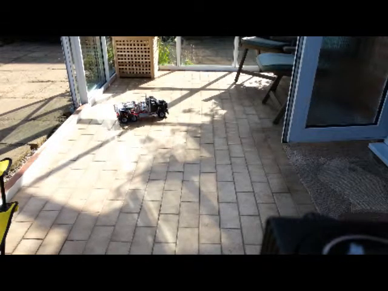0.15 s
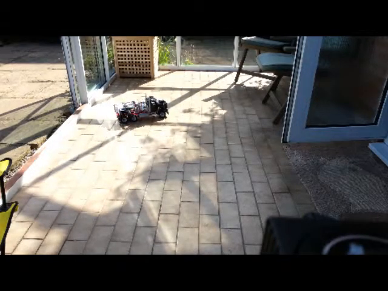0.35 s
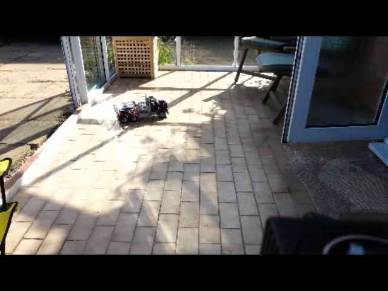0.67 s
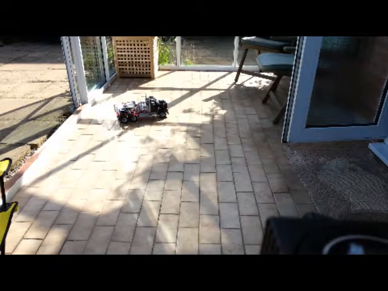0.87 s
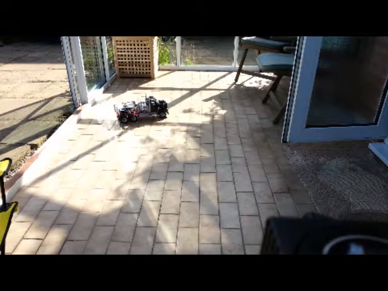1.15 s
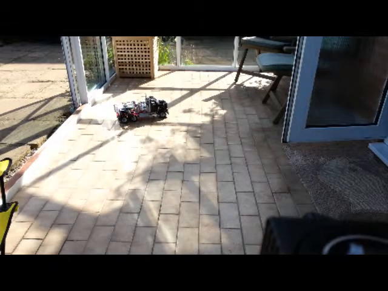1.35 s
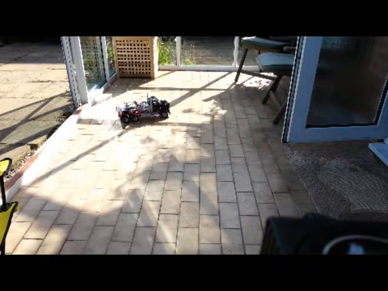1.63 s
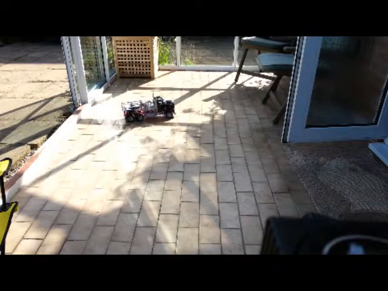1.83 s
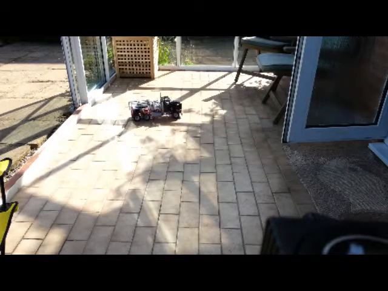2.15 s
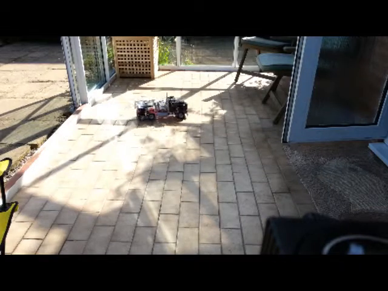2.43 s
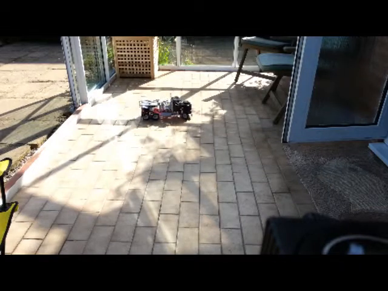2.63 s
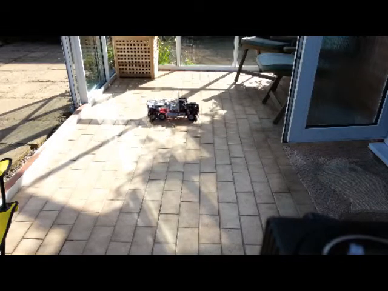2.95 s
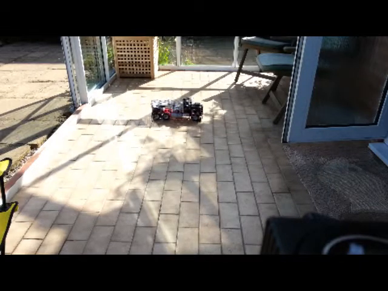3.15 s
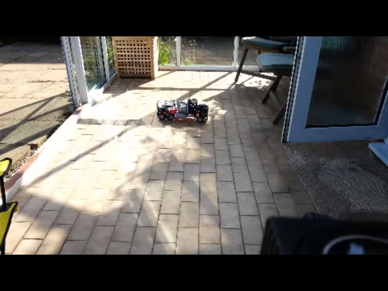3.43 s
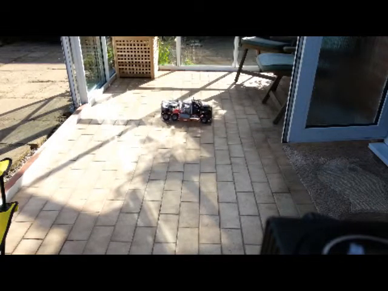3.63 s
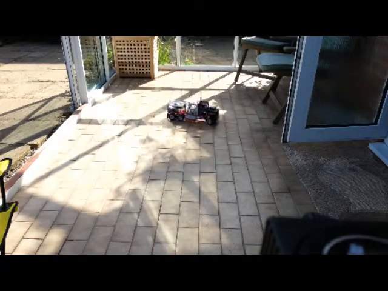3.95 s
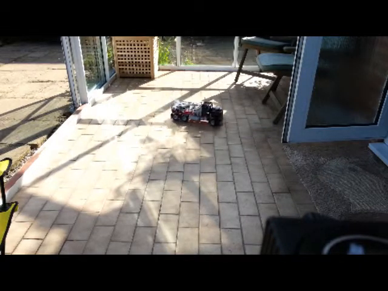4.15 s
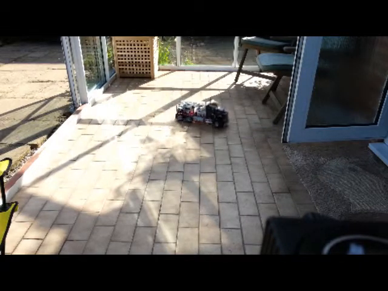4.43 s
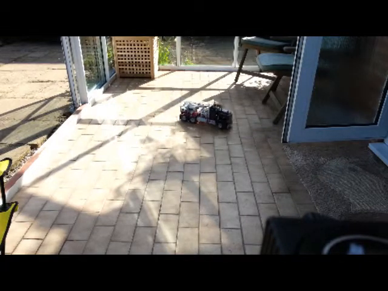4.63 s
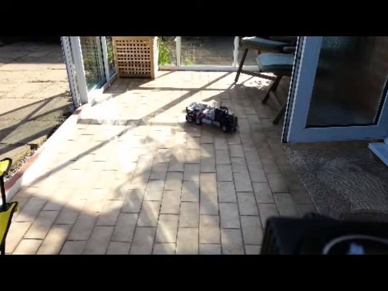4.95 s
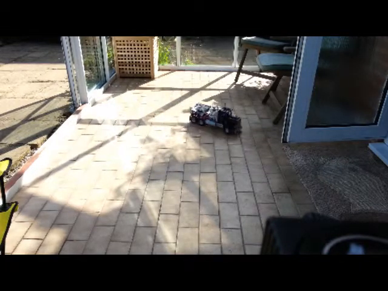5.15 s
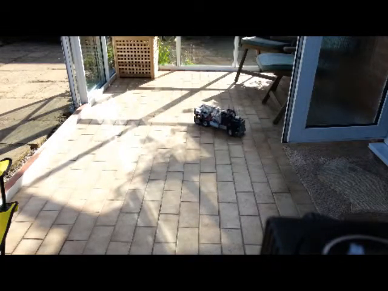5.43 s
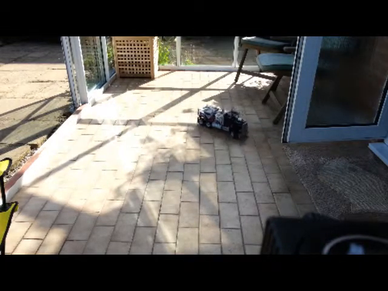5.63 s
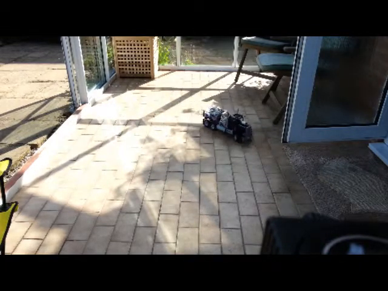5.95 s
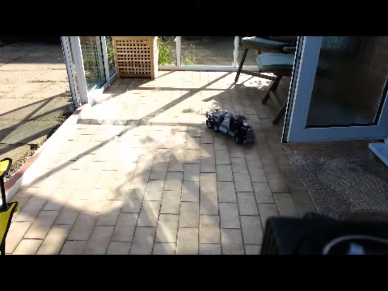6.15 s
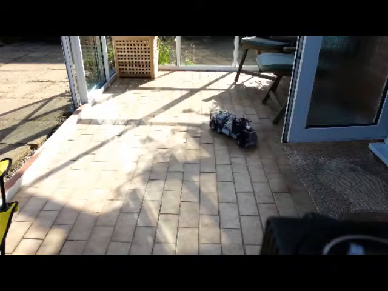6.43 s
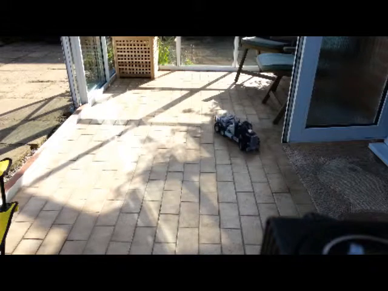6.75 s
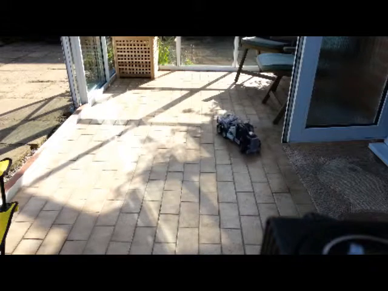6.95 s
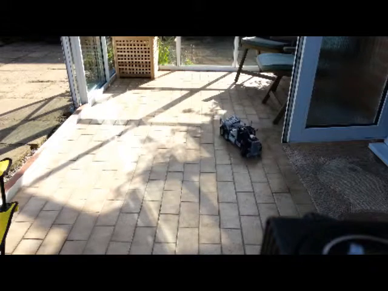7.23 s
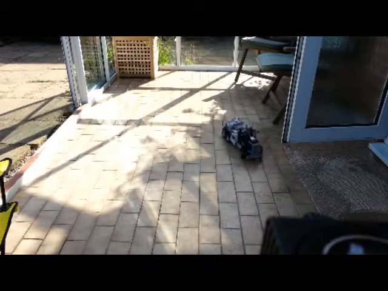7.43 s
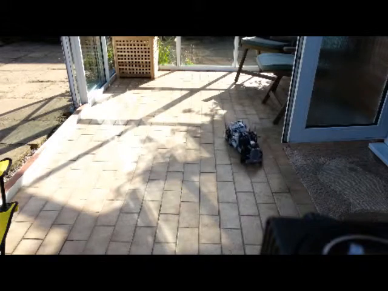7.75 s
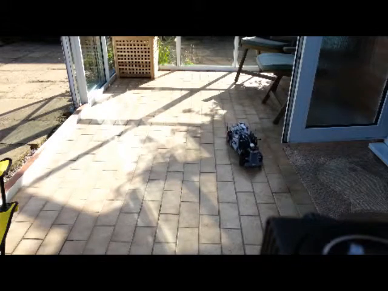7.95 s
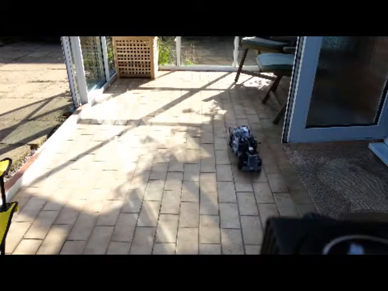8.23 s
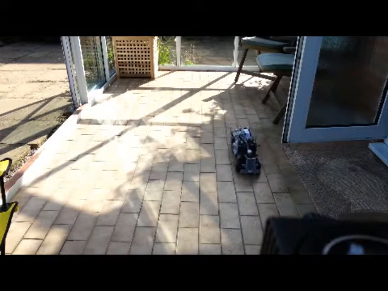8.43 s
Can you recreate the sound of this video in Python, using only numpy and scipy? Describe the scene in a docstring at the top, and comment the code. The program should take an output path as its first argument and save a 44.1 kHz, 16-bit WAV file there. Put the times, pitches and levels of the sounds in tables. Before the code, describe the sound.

The tail of a small electric motor fades, followed by a gap of soft air, low wind buffets, a tiny plastic tick and quick sparrow whistles. The motor restarts with a laboured growl and jumps in pitch, settling into a slightly wavering, buzzy plastic-gear whine that runs to the end. Wheels rumble lightly over paving, sparse chirps and barely audible distant hoots show through, and late wind thumps hit the microphone.

```python
"""A small model truck crawls over paving between glass walls and passes in front of two microphones.
Its motor coasts out, restarts and whines: a ten-tooth pinion sings at multiples of the tooth rate, over
shaft-locked gear rattle, brush hiss and wheel rumble, all with yard echoes except the rumble.
Wind noise buffets the microphone ports, sparrows chirp nearby as gliding, warbling whistles,
a plastic part ticks once, faint low hoots come from afar, and quiet outdoor air lies underneath."""
import sys
import numpy as np
from scipy import signal
from scipy.fft import rfft, irfft, next_fast_len
from scipy.io import wavfile

SR = 44100
rng = np.random.default_rng(int(sys.argv[2]) if len(sys.argv) > 2 else 0)


def to_wav(s):
    """Save 16-bit WAV."""
    ch = np.atleast_2d(s).T  # columns
    pcm = np.round(np.clip(ch, -1, 1) * 32767)  # PCM
    wavfile.write(sys.argv[1], SR, pcm.astype(np.int16))


N = 378378

# In every table a positive left-right level means louder on the left; spectra are relative shapes.
# Motor speed at its turning points: it spins up in two pulls, then sags about once a wheel turn.
# Each row: time in seconds, tooth rate in Hz.
TOOTH_RATE = [(1.24, 304.2), (1.32, 495), (1.39, 536.5), (1.45, 504.5), (1.52, 465), (1.58, 548),
              (1.64, 600.4), (1.74, 673), (1.81, 633.4), (1.92, 596.6), (2.12, 643.4), (2.27, 612.6),
              (2.4, 642.8), (2.56, 639), (2.74, 624), (2.97, 645), (3.28, 615.2), (3.51, 645.4),
              (3.79, 599), (3.88, 616.2), (4.02, 634.6), (4.15, 629.8), (4.31, 607.7), (4.64, 648.6),
              (4.83, 619.8), (5.03, 656.5), (5.32, 587.7), (5.54, 632.5), (5.75, 624.3), (6.03, 633.4),
              (6.36, 595.2), (6.63, 634.8), (6.82, 607.6), (6.99, 616), (7.18, 590.3), (7.35, 603),
              (7.48, 618), (7.59, 618.7), (7.75, 603.3), (8.06, 626), (8.39, 611.4), (8.58, 622)]
# Motor noise through coasting, rest, start and drive, before the mix gains.
# Each row: time in seconds, rattle level in dB, brush hiss level in dB.
MOTOR_LEVELS = [(0, -43.5, -43.5), (.12, -54.5, -49.5), (.25, -69, -81), (1.2, -63.5, -67),
                (1.235, -58, -58), (1.265, -53, -43), (1.28, -48, -46), (1.32, -38.5, -43), (1.4, -39, -51),
                (1.48, -40, -49.5), (1.61, -37, -40.5), (1.9, -34.5, -40.5), (2.2, -33.5, -40.5),
                (5.8, -34.5, -40.5), (7.2, -36, -40.5), (8.58, -35.5, -40.5)]
# The truck crosses in front of the microphones.
# Each row: time in seconds, delay of the left microphone in ms, left-right level in dB.
POSITION = [(0, 0.32, -1.5), (5.2, 0.42, -1.5), (6.2, -0.0635, -1), (8.58, -0.044, -1)]
# Gear tones beside the whine. Each row: cycles per shaft turn, level in dB re the rattle before extra gain.
GEAR_TONES = [(10, -36), (12, -35.5), (17, -35.5), (24, -32), (27, -23), (33, -33), (37, -24.5), (38, -36),
              (42, -22), (43, -24), (44, -29.5), (47, -22.5), (52, -22.5), (53, -35.5), (57, -23.5),
              (62, -17), (64, -21), (66, -21), (73, -19), (76, -38), (86, -29), (90, -21), (92, -29),
              (100, -27), (110, -28), (139, -27), (159, -26), (166, -30), (169, -28), (179, -28)]
# Extra gain of these gear tones. In order: before and after the truck is under way, in dB.
GEAR_TONES_GAIN = (6, 3)
# Uneven shaft turning. In order: spread before and after the truck is under way, in radians.
SHAFT_SHUDDER = (.042, .004)
# Colour of the gear rattle. Each row: frequency in Hz, density in dB per Hz.
RATTLE_SPECTRUM = [(470, -107), (800, -20.5), (879, -19), (1230, -13), (1350, -14), (1570, -19),
                   (1840, -5.5), (2200, -15), (2650, -8.5), (2860, -9), (3100, -2), (3450, -8), (3900, -1),
                   (4150, -4), (4460, 3), (4740, -6), (4970, -3.5), (5300, -6.5), (7500, -21.5),
                   (9750, -17), (16500, -120)]
# Colour of the brush hiss. Each row: frequency in Hz, density in dB per Hz.
BRUSH_SPECTRUM = [(3820, -38), (6500, -4), (8800, -9), (10100, -1), (10700, 0.5), (11300, -3.5),
                  (14400, -30)]
# Wheel rumble on the paving. Each row: time in seconds, level in dB.
ROLLING_LEVEL = [(0, -75), (.12, -59.5), (1.2, -61.5), (1.32, -53), (1.42, -58.5), (1.61, -52),
                 (2.1, -55.5), (4.0, -58), (4.7, -59), (6.0, -57), (6.5, -55), (8.3, -56), (8.58, -56)]
# Balance of the wheel rumble before flicker. Each row: band centre in Hz, level in dB.
RUMBLE_BANDS = [(200, -7.5), (270, -1.5), (370, 2), (500, 2), (680, 2), (900, 3), (1200, -38)]
# Background air sinks once the motor runs, then creeps back. Each row: time in seconds, level in dB.
AIR_LEVEL = [(0, -53), (1.2, -54.5), (1.7, -68), (7.3, -56.5), (8.58, -58)]
# Colour of the outdoor air. Each row: frequency in Hz, density in dB per Hz.
AIR_SPECTRUM = [(110, -85), (170, -30), (250, -12), (600, -14.5), (1200, -20), (3000, -23), (6500, -26),
                (12000, -25), (14500, -32.5)]
# Wind at the ports before flutter. Each row: time in seconds, rumble level in dB, left-right level in dB.
GUSTS = [(0, -73, 7), (.2, -43, 13), (.4, -55.5, -18), (.72, -66, 22), (.82, -45.5, 10), (1.0, -59, 11),
         (1.3, -71, -7), (1.53, -68, 2), (1.59, -95, 0), (1.66, -62.5, 20), (1.96, -68, 11),
         (2.25, -58, 13.5), (2.42, -73, 26), (2.63, -66, 10), (2.69, -97, 0), (2.74, -57, 1),
         (3.06, -70, 11), (3.11, -100, 0), (3.82, -105, 0), (3.89, -57, 18), (3.97, -93, 2), (4.03, -63, 3),
         (4.17, -105, 0), (4.26, -60, 7), (4.33, -114, 0), (7.4, -105, -17), (7.46, -60, -8),
         (7.53, -90, 3), (7.66, -55.5, -4), (7.78, -59, -44), (7.88, -59.5, 2), (8.08, -48.5, -27),
         (8.26, -63, 0), (8.32, -80, 3), (8.4, -68, 13), (8.58, -88, 11)]
# Colour of the wind rumble. Each row: frequency in Hz, density in dB per Hz.
WIND_SPECTRUM = [(25, -50), (60, -7), (120, -6.5), (180, -8), (300, -17.5), (500, -37), (1000, -100)]
# The hardest buffets on the ports.
# Each row: start in seconds, envelope peak in dB, pitch in Hz, left-right level in dB.
BUFFETS = [(0.123, -44.5, 158, 34), (0.169, -48, 151, 7), (0.204, -31, 197.7, -11), (0.299, -39, 153, 8),
           (0.367, -35.5, 82, -10), (0.766, -36, 104, 0), (0.827, -38, 133, 19), (0.854, -41, 155, 18),
           (0.955, -41, 114, 10), (2.03, -43, 102, 5), (7.721, -37.5, 193.3, -31),
           (7.801, -38.5, 193, -36.5), (7.873, -33, 97.1, 2), (7.945, -48, 117.8, -19),
           (8.073, -42, 136.9, -33), (8.103, -39, 111.7, -18), (8.149, -33, 179.3, -7),
           (8.2, -42, 156.9, 5)]
# Sparrows nearby, levels before the echo mix. Each row: start in seconds, length in seconds, start, middle
# and end pitch in Hz, warble depth in Hz, level in dB, left-right level in dB.
CHIRPS = [(0.068, 0.06, 4000, 4150, 3850, 140, -34, -2), (0.085, 0.04, 3700, 3480, 3300, 80, -41, -2),
          (0.118, 0.06, 3050, 3000, 2850, 200, -38, -3), (0.625, 0.05, 5000, 5250, 4900, 250, -51, -5),
          (0.645, 0.095, 3300, 4500, 2956, 380, -34, -2), (0.741, 0.094, 3800, 3300, 2960, 260, -42.5, 1),
          (0.825, 0.09, 5300, 5100, 4300, 400, -54, -4), (0.838, 0.055, 2830, 2520, 2400, 150, -45.5, -1),
          (0.88, 0.08, 2700, 3700, 2700, 300, -40, -0.5), (1.172, 0.13, 5050, 4300, 3500, 400, -42, -2),
          (1.2, 0.14, 3500, 3150, 2750, 260, -41, -2), (1.219, 0.045, 6580, 6560, 6520, 20, -46, -11),
          (1.232, 0.03, 6050, 6000, 5950, 60, -49, -5), (1.39, 0.044, 3700, 4210, 3700, 220, -35.5, -4),
          (4.01, 0.098, 4305, 3744, 2970, 450, -37.5, -2), (5.399, 0.11, 4485, 3795, 3180, 450, -37, -5),
          (5.8, 0.05, 6080, 6000, 5820, 60, -42, -3), (6.978, 0.11, 4710, 3998, 3030, 450, -34.5, -1),
          (7.74, 0.04, 5850, 5830, 5740, 50, -42, -7), (7.802, 0.079, 4150, 3780, 2915, 380, -35.5, -1),
          (8.215, 0.055, 6050, 5980, 5880, 50, -41, -4)]
# A plastic part settles. Each row: start in seconds, starting noise level in dB before the band filter.
TICK = [(0.169, -32)]
# The tooth tones set in. In order: start and end of the fade-in, in seconds.
SPIN_UP = (1.26, 1.31)
# Three times the tooth rate, swelling and fading as the truck turns, before random fades and case ring.
# Each row: time in seconds, peak level in dB.
THIRD_TONE = [(1.3, -56), (1.38, -39), (1.4, -35), (1.46, -54), (1.57, -44), (1.74, -53), (1.81, -34),
              (1.89, -33.5), (2.08, -42), (2.23, -36), (2.62, -41), (2.72, -36.5), (2.91, -48), (3.12, -39),
              (3.15, -43), (3.22, -34.5), (3.56, -45.5), (3.73, -30.5), (3.79, -39.5), (3.87, -35),
              (4.14, -42), (4.32, -39), (4.45, -44), (4.5, -37.5), (4.57, -44), (4.76, -35), (4.8, -37),
              (4.89, -40), (4.95, -42.5), (5.17, -34), (5.21, -35), (5.37, -34), (5.51, -44), (5.59, -36),
              (5.63, -53), (5.71, -38), (5.91, -44), (6.11, -38.5), (6.2, -38), (6.28, -26.5),
              (6.41, -34.5), (6.47, -33), (6.55, -37), (6.83, -34), (7.04, -41.5), (7.08, -35.5),
              (7.2, -33), (7.26, -35.5), (7.56, -33.5), (7.61, -33.5), (7.71, -39), (7.76, -32),
              (7.88, -38.5), (7.94, -28), (8.03, -29.5), (8.1, -24.5), (8.171, -37), (8.27, -30.5),
              (8.35, -36), (8.4, -31), (8.45, -37), (8.54, -35)]
# Higher tooth tones, before random fades and case ring.
# Each row: time in seconds, fifth, seventh and eighth tone peak level in dB.
UPPER_TONES = [(1.3, -62, -59, -43), (1.53, -56, -54, -39), (1.65, -59, -51, -46), (1.75, -60, -51, -46),
               (1.8, -44, -38, -39), (1.86, -48, -40, -53), (1.92, -52, -45, -54), (2.01, -51, -44, -43),
               (2.1, -54, -43, -36), (2.26, -42, -37, -55), (2.36, -57, -50, -48), (2.45, -50, -41, -44),
               (2.74, -44, -40, -46), (3.0, -50, -43, -57), (3.29, -40, -42, -51), (3.54, -63, -42, -46),
               (3.67, -42, -40, -44), (3.78, -43, -37, -47), (4.12, -43, -40.5, -48),
               (4.28, -37.5, -40, -45), (4.63, -47, -42, -52), (4.82, -42, -35.5, -40),
               (4.96, -46, -42, -52), (5.29, -41.5, -38.5, -42), (5.5, -42, -41.5, -41.5),
               (6.23, -44, -39.5, -46), (6.36, -43, -34, -46), (6.62, -45, -45, -46),
               (6.77, -37.5, -37.5, -42), (7.24, -43, -45.5, -48), (7.54, -40, -40.5, -55),
               (7.96, -47, -45, -43), (8.35, -35.5, -38, -50), (8.54, -39, -44, -57)]
# How strongly the gear case radiates the second, fourth and sixth tooth tone, before random fades.
# Each row: frequency in Hz, peak level in dB re the rattle setting.
CASE_RESPONSE = [(900, -19), (1180, -21), (1250, -19), (1310, -12.5), (1350, -3), (2000, -39), (2450, -11),
                 (2600, -13.5), (3200, -29), (3650, -9.5), (3850, -11.5)]
# A sharp ring of the case lifts a tone passing through. In order: centre in Hz, width in Hz, lift in dB.
CASE_RING = (4125, 45, 7)
# The gears labour at the start. Each row: time in seconds, level in dB.
GROWL_LEVEL = [(1.27, -90), (1.32, -53), (1.39, -51), (1.42, -44), (1.55, -45), (1.62, -52), (1.68, -88)]
# Colour of that growl. Each row: frequency in Hz, density in dB per Hz.
GROWL_SPECTRUM = [(1250, -44), (1420, 1), (1490, -8), (1570, 0), (1680, -16), (1790, 0), (1840, -16),
                  (1895, 6), (1960, -13), (2150, -35)]
# Faint low hoots from afar. Each row: start and length in seconds, start and end pitch in Hz, peak in dB.
HOOTS = [(3.93, 0.21, 824, 830, -55), (5.6, 0.31, 552, 467.3, -55.5), (6.25, 0.18, 458, 369, -59),
         (6.37, 0.229, 853, 782, -56.5), (7.2, 0.26, 473.5, 385.8, -60.5)]

TEETH = 10
UNDER_WAY_S, SETTLE_S = 1.66, 0.41   # the shaft turns unevenly under load, then settles over this time
YARD_T60_S, GARDEN_T60_S = 0.75, 0.36   # the birds sit outside, with shorter echoes
TREBLE_T60_S = 1   # extra damping above the middle range
ECHO_CHANGE_S = 0.45   # the moving truck meets a new set of echoes this often
RASP, RASP_HZ = 0.33, 614   # greatest breathy roughness of the chirps, and its bandwidth
CUTOFF_HZ = 14500


def amp(db):
    """Decibels to gain."""
    return 10 ** (np.asarray(db) / 20)


def rms_one(x):
    """Scale to unit rms."""
    return x / np.sqrt(np.mean(x ** 2) + 1e-20)


def noise():
    """White noise, unrelated at the two microphones."""
    return rng.standard_normal((2, N))


def in_time(rows):
    """Columns of a curve table at every sample."""
    s, *columns = np.transpose(rows)
    return [np.interp(np.arange(N) / SR, s, c) for c in columns]


def eased(rows):
    """A curve that swings smoothly from one turning point to the next."""
    s, value = np.transpose(rows)
    place = np.interp(np.arange(N) / SR, s, np.arange(len(s)))
    smooth_place = place - np.sin(2 * np.pi * place) / (2 * np.pi) * 0.572
    return np.interp(smooth_place, np.arange(len(s)), value)


def panned(pan_db):
    """Left and right gains for a level difference."""
    return amp(np.array([pan_db / 2, -pan_db / 2]))


def colour(x, spectrum):
    """Shape by a (Hz, dB) spectrum, read on a log frequency axis; rms 1."""
    size = next_fast_len(N)
    hz, db = np.transpose(spectrum)
    bin_hz = np.arange(size // 2 + 1) * SR / size
    gain = amp(np.interp(np.log(bin_hz + 1), np.log(hz), db))
    return rms_one(irfft(rfft(x, size) * gain, size)[..., :N])


def drift(rate_hz):
    """Slow chance of spread 1, own in each channel: noise every 64 samples through a two-pole lowpass."""
    r = np.exp(-2 * np.pi * rate_hz * 64 / SR)
    steps = rng.standard_normal((2, N // 64 + 1002))
    slow = signal.lfilter([1], [1, -2 * r, r * r], steps)[:, 1000:]   # skip the filter's start
    return np.array([np.interp(np.arange(N) / 64, np.arange(len(s)), rms_one(s)) for s in slow])


def yard(x, t60_s):
    """Dense reflections from glass and paving, unrelated at the two microphones; the treble dies sooner."""
    t = np.arange(SR // 2) / SR
    white = rng.standard_normal((2, len(t)))
    dull = signal.sosfilt(signal.butter(2, 3600, fs=SR, output="sos"), white)
    echo = dull + (white - dull) * amp(-60 * t / TREBLE_T60_S)
    echo = echo * amp(-60 * t / t60_s) * np.minimum(t / 0.018, 1)   # builds up over 18 ms
    return signal.fftconvolve(x, echo / np.sqrt(np.sum(echo ** 2) / 2), axes=1)


def yard_on_the_move(x):
    """Overlapping stretches of the drive, each with echoes of its own."""
    hop = int(ECHO_CHANGE_S * SR)
    padded = np.pad(x, ((0, 0), (hop, 2 * hop)))
    out = np.zeros((2, N + 3 * hop + SR))
    fade = np.sin(np.pi * np.arange(2 * hop) / (2 * hop))
    for i in range(0, N + hop, hop):
        wet = yard(padded[:, i:i + 2 * hop] * fade, YARD_T60_S)
        out[:, i:i + wet.shape[1]] += wet
    return out[:, hop:hop + N]


def truck():
    """Gear and brush noise locked to the motor shaft, plus wheels, placed before the microphones."""
    tooth_hz = eased(TOOTH_RATE)
    rattle_db, hiss_db = in_time(MOTOR_LEVELS)
    lag_ms, pan_db = in_time(POSITION)
    change_s = (UNDER_WAY_S, UNDER_WAY_S + SETTLE_S)
    shudder, tones_db = in_time(np.transpose([change_s, SHAFT_SHUDDER, GEAR_TONES_GAIN]))
    turn = 2 * np.pi * np.cumsum(tooth_hz / TEETH) / SR + shudder * drift(76.6)[0]   # shaft angle, radians
    wobble = np.cos(turn)    # an off-centre pinion puts side lines one shaft order apart
    beat = 1 + 0.5 * wobble + 0.024 * np.cos(3 * turn) + 0.28 * np.cos(TEETH * turn)
    play = noise() * beat * amp(2.0 * drift(44.0))   # loose play, beaten by the turn
    flaws = tooth_flaws(turn)
    gears = amp(-3.3) * rattle(play, flaws) + amp(tones_db) * gear_tones(turn, wobble)
    noisy = amp(rattle_db) * gears + growl(play) + amp(hiss_db) * brush_hiss(beat, flaws)
    tooth_tones = whine(tooth_hz, turn, wobble, rattle_db)
    # both microphones share part of the direct sound, the left with its own delay
    first, second = noisy
    late = np.interp(np.arange(N) - lag_ms * SR / 1000, np.arange(N), first)
    alike = 0.55
    direct = np.array([late, alike * first + np.sqrt(1 - alike ** 2) * second])
    echoes = yard_on_the_move(amp(-2) * direct + amp(-12) * tooth_tones)
    rumble = amp(in_time(ROLLING_LEVEL)[0]) * wheels()
    return panned(pan_db) * (direct + tooth_tones + rumble + echoes)


def gear_tones(turn, wobble):
    """Sines at shaft orders; moving echoes swell, cancel and shift each one differently at each microphone."""
    out = 0
    for order, db in GEAR_TONES:
        phase = order * turn + 0.4 * wobble + 1.95 * drift(4.8)
        out = out + amp(db) * np.sqrt(2) * amp(4.0 * drift(17.0)) * np.sin(phase)
    return out


def tooth_flaws(turn):
    """The same tooth flaws return on every turn: a random wave of 200 shaft orders read by angle; rms 1."""
    waves = irfft(np.exp(2j * np.pi * rng.random((2, 200))), 2048)
    where = turn / (2 * np.pi) % 1 * 2048
    return rms_one(np.array([np.interp(where, np.arange(2048), w, period=2048) for w in waves]))


def rattle(play, flaws):
    """Loose play and repeating tooth flaws, coloured as gear rattle; rms 1."""
    return colour(play + 0.8 * flaws, RATTLE_SPECTRUM)


def brush_hiss(beat, flaws):
    """Brush noise that pulses and repeats with the shaft; rms 1."""
    return colour(noise() * beat + 1.08 * flaws, BRUSH_SPECTRUM)


def wheels():
    """Rolling over the joints of the paving: each band of the rumble comes and goes on its own; rms 1."""
    out = 0
    for hz, db in RUMBLE_BANDS:
        band = signal.butter(3, [hz / 1.17, hz * 1.17], "band", fs=SR, output="sos")
        flicker = np.minimum(drift(8.7), 1)    # dips go deep, swells stay mild
        out = out + amp(db + 17.7 * flicker) * rms_one(signal.sosfilt(band, noise()))
    return rms_one(out)


def outdoor_air():
    """Quiet background: steady coloured noise under a slow level curve."""
    return amp(in_time(AIR_LEVEL)[0]) * colour(noise(), AIR_SPECTRUM)


def wind():
    """Lumpy rumble, own at each port, and single eddies that thump for a cycle or two."""
    level_db, pan_db = in_time(GUSTS)
    flutter_db = 6.5 * np.minimum(drift(49.0), 1.6) + 2.0 * drift(7.6)
    out = amp(level_db + flutter_db) * panned(pan_db) * colour(noise(), WIND_SPECTRUM)
    phases = rng.random((len(BUFFETS), 2))   # in cycles, own at each port
    for (s, db, hz, side_db), phase in zip(BUFFETS, phases):
        cycles = np.arange(int(3 * SR / hz)) * hz / SR
        envelope = cycles * np.exp(1 - cycles / 0.5) / 0.5   # peaks after half a cycle
        thump = np.sin(2 * np.pi * (cycles + phase[:, None])) * envelope
        i = int(s * SR)
        out[:, i:i + len(cycles)] += (amp(db) * panned(side_db)[:, None] * thump)[:, :N - i]
    return out


def sparrows():
    """Each chirp is a gliding whistle, roughened by a fast uneven warble, heard mostly through echoes."""
    out, uneven = np.zeros((2, N)), drift(146.0)[0]
    breath_filter = signal.butter(3, RASP_HZ, fs=SR, output="sos")
    breath = rms_one(signal.sosfilt(breath_filter, rng.standard_normal(N)))
    for s, length, start_hz, mid_hz, end_hz, warble_hz, db, pan_db in CHIRPS:
        u, i = np.linspace(0, 1, int(length * SR)), max(int(s * SR), 0)
        span = slice(i, i + len(u))
        cycle = 2 * np.pi * 130 * u * length   # warble at 130 Hz
        hz = np.interp(u, [0, 0.4, 1], [start_hz, mid_hz, end_hz])
        hz = hz + warble_hz * (np.sin(cycle) + 0.5 * uneven[span])
        rasp = RASP * min(warble_hz / 200, 1) * breath[span]   # less on weakly warbled chirps
        envelope = np.sin(np.pi * u) ** 0.63 * (1 + 0.12 * np.cos(cycle) + rasp)
        whistle = envelope * np.sin(2 * np.pi * np.cumsum(hz) / SR)
        out[:, span] += amp(db) * panned(pan_db)[:, None] * whistle
    return amp(-2.5) * out + amp(3.5) * yard(out, GARDEN_T60_S)[:, :N]


def tick():
    """A plastic part settles: bright noise that dies away in a millisecond or two."""
    out, t = np.zeros((2, N)), np.arange(300) / SR
    for s, db in TICK:
        i = int(s * SR)
        out[:, i:i + len(t)] = amp(db) * rng.standard_normal((2, len(t))) * np.exp(-t / 0.0015)
    return signal.sosfilt(signal.butter(3, [2000, 11000], "band", fs=SR, output="sos"), out)


def whine(tooth_hz, turn, wobble, rattle_db):
    """The pinion sings at multiples of the tooth rate, radiated by the gear case."""
    running = np.interp(np.arange(N) / SR, SPIN_UP, (0, 1))
    ring_hz, ring_width_hz, ring_db = CASE_RING
    case_hz, case_db = np.transpose(CASE_RESPONSE)
    levels_db = dict(zip((3, 5, 7, 8), in_time(THIRD_TONE) + in_time(UPPER_TONES)))
    for multiple in (2, 4, 6):
        radiated_db = np.interp(multiple * tooth_hz, case_hz, case_db)
        levels_db[multiple] = rattle_db + radiated_db + 3.0 * drift(4.0)
    out = 0
    for multiple, level_db in levels_db.items():
        lift_db = ring_db * np.exp(-((multiple * tooth_hz - ring_hz) / ring_width_hz) ** 2)
        # the two microphones hear each tone about a fifth of a cycle apart
        apart = (0.66 + 0.2 * drift(10.0)[0]) * np.array([[-1], [1]])
        phase = multiple * (TEETH * turn + 0.03 * wobble) + apart
        out = out + running * amp(level_db + lift_db + 4.0 * drift(30.0)) * np.sin(phase)
    return out


def growl(play):
    """The gears labour at the start: the loose play again, through narrow low resonances."""
    return amp(in_time(GROWL_LEVEL)[0]) * colour(play, GROWL_SPECTRUM)


def hoots():
    """Soft gliding tones, most of them falling, with yard echoes."""
    out = np.zeros((2, N))
    for s, length, start_hz, end_hz, db in HOOTS:
        u, i = np.linspace(0, 1, int(length * SR)), int(s * SR)
        hz = start_hz + (end_hz - start_hz) * u ** 1.575
        envelope = np.sqrt(np.sin(np.pi * u) + 1e-9)
        out[:, i:i + len(u)] += amp(db) * envelope * np.sin(2 * np.pi * np.cumsum(hz) / SR)
    return out + yard(out, YARD_T60_S)[:, :N]


def scene():
    """Truck, quiet outdoor air, wind, birds, tick and hoots."""
    return truck() + outdoor_air() + wind() + sparrows() + tick() + hoots()


def record(dry):
    """The microphones drop the deepest bass; the top is cut steeply."""
    heard = signal.sosfilt(signal.butter(2, 58.0, "high", fs=SR, output="sos"), dry)
    return signal.sosfilt(signal.ellip(12, 0.5, 80, CUTOFF_HZ, fs=SR, output="sos"), heard)


dry = scene()
out = record(dry)
to_wav(out)
```